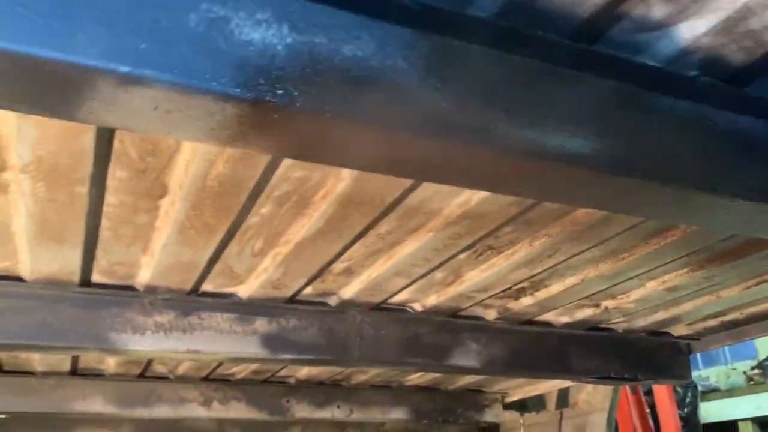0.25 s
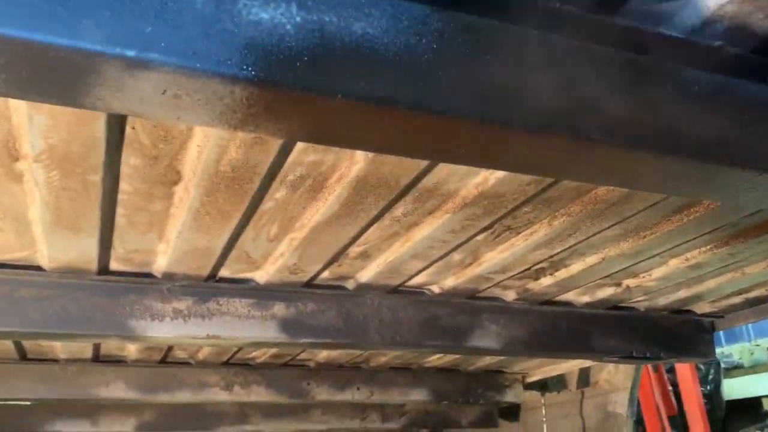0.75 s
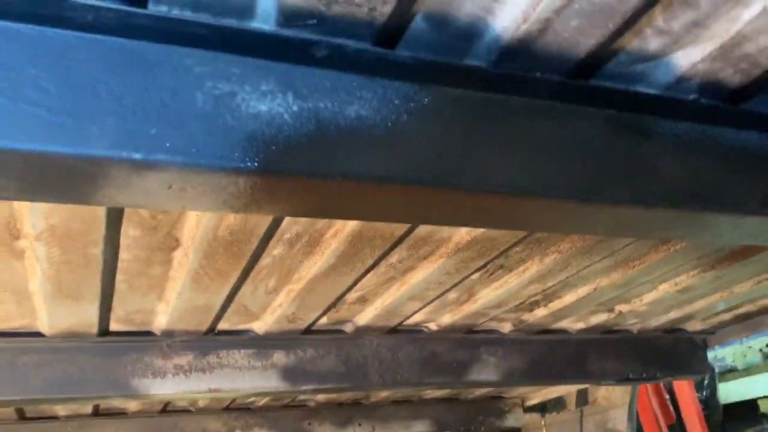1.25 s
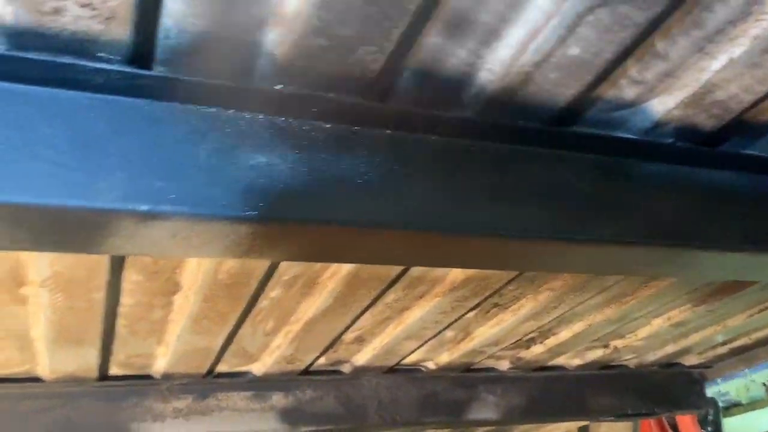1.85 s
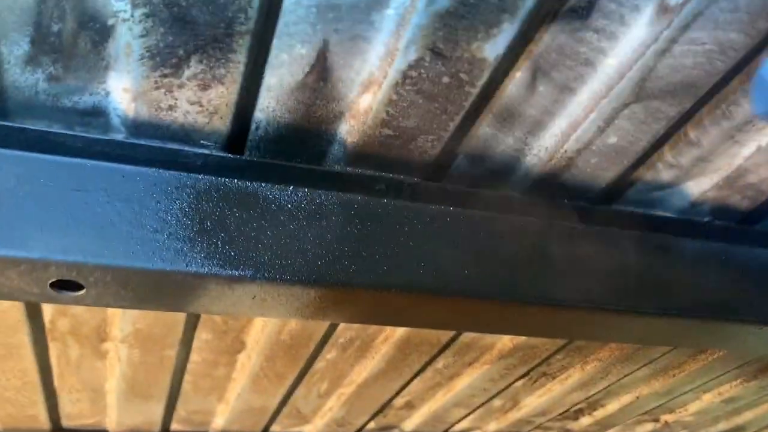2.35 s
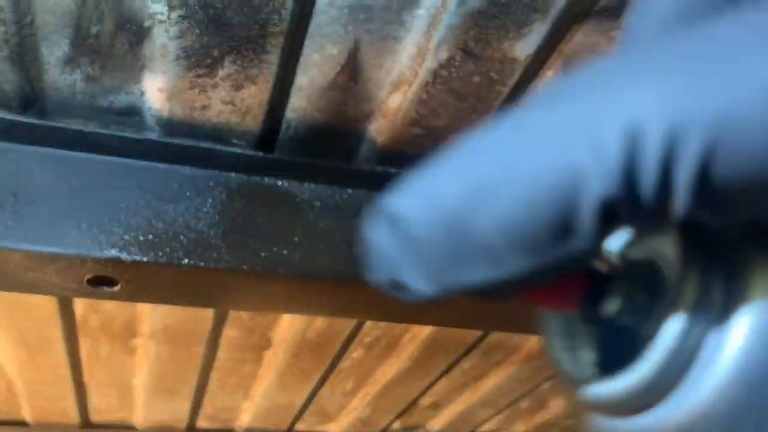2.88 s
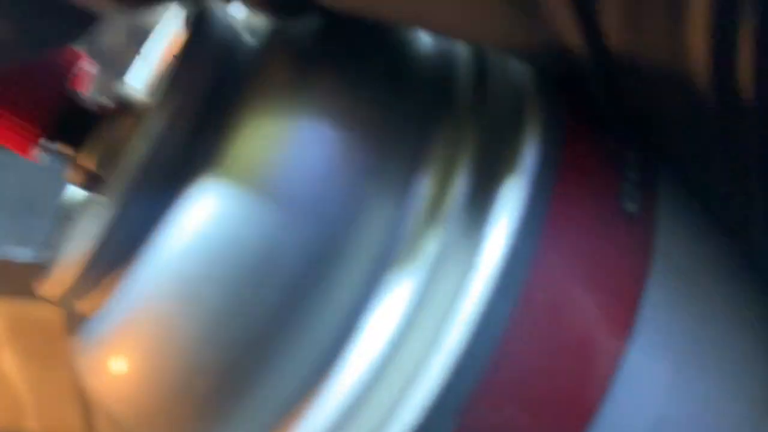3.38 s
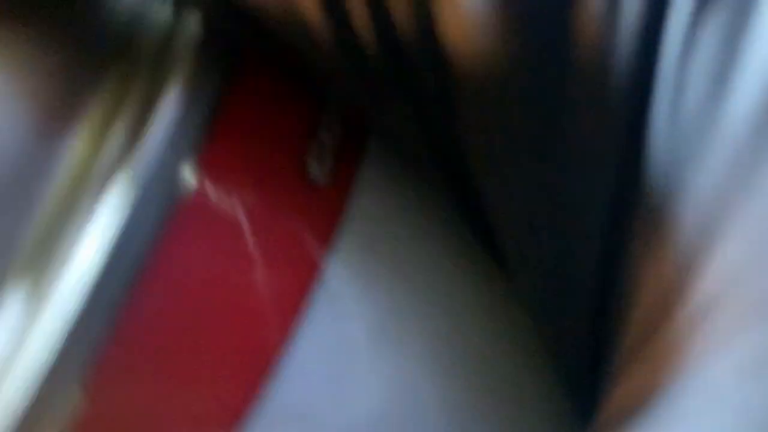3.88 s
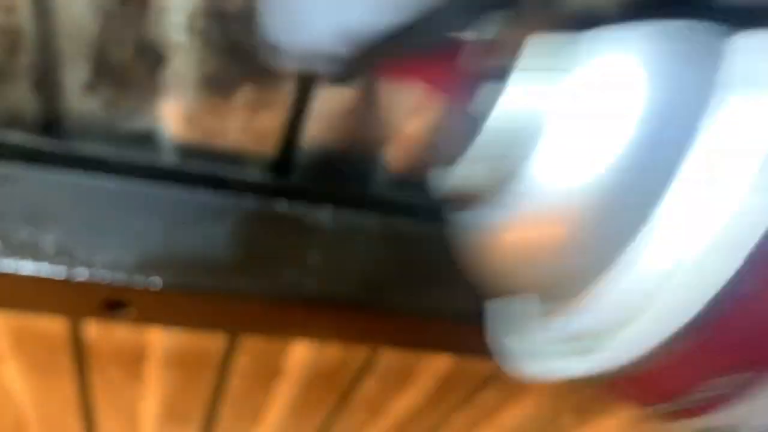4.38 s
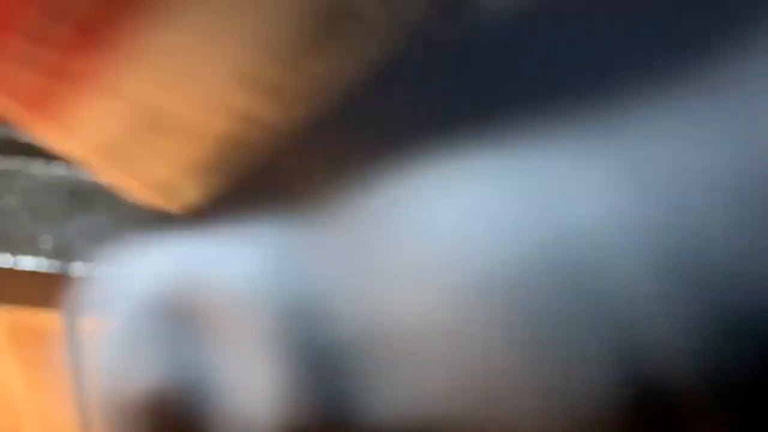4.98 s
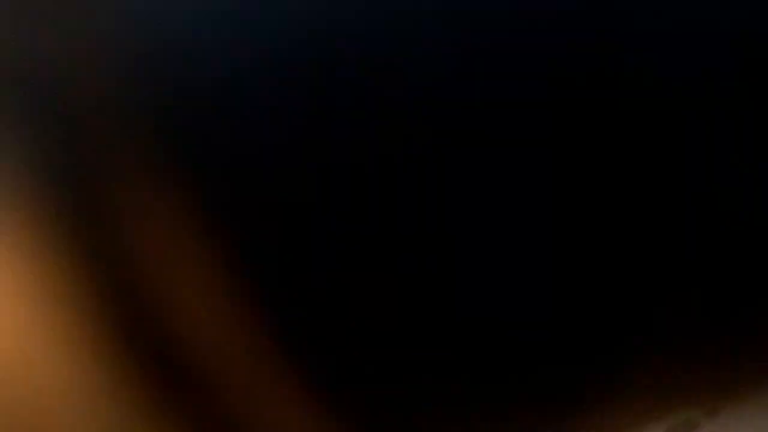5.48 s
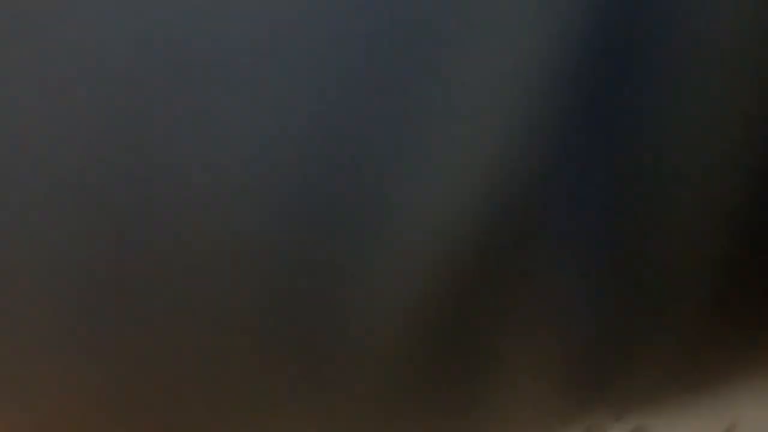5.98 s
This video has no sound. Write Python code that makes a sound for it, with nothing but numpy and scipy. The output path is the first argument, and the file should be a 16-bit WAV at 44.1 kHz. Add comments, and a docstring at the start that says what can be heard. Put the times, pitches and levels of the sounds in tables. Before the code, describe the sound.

A spray can hisses in ten short, close bursts, with sharp metallic clicks and light rattles of its mixing ball.

```python
"""Ten short hissing bursts from a spray can coating steel beams under a trailer deck, close up, mono.
The jet hisses brightly; can wall and a hollow beam resonate; the draught puffs at the mic.
Between bursts the mixing ball clatters in the can and the gloved hand shuffles.
Hiss and knocks reflect between ground and deck. Behind: faint tones, far rumble, mic hiss and,
at the end, a hand bumping the mic."""
import sys
import numpy as np
from scipy import signal
from scipy.io import wavfile
from scipy.ndimage import uniform_filter1d

SR = 44100
rng = np.random.default_rng(int(sys.argv[2]) if len(sys.argv) > 2 else 0)


def store_pcm(level_fs):
    """Save levels as 16-bit WAV."""
    pcm = np.round(np.clip(level_fs, -1, 1) * 32767).astype(np.int16)
    wavfile.write(sys.argv[1], SR, np.atleast_2d(pcm).T)


N = 274743

# valve presses: open t/s, rise/s, shut t/s, nearest t/s, sweep width/s;
# level/dB at nearest of jet, top, low wall, high wall, deck, draught, beam;
# f/Hz of the lift, dip, treble lift and treble dip set by hand and aim
BURSTS = [(0.069, 0.026, 0.26, .16, 0.1, -26, -20, -25, -21, -31, -41, -49, 4704, 4296, 9000, 6686),
          (0.634, .024, 0.7547, .705, 0.066, -25.5, -19, -24, -23, -33.5, -42.5, -47, 4900, 1768, 8800, 7938),
          (1.767, 0.023, 1.9274, 1.84, 0.086, -24, -19, -23.5, -23.5, -33.5, -44.5, -38.5, 3390, 2238, 9730, 6190),
          (2.134, 0.021, 2.294, 2.236, 0.11, -24.5, -24.5, -28.5, -28, -40.5, -55.5, -42.5, 4167, 2080, 5780, 6184),
          (2.506, 0.032, 2.684, 2.63, 0.11, -25.5, -22.5, -28.5, -25, -34.5, -41.5, -43.5, 2614, 3260, 9290, 8030),
          (3.077, 0.022, 3.2675, 3.2, 0.1, -24.5, -22.5, -27, -24.5, -36, -47, -44.5, 2595, 4957, 5580, 7390),
          (3.992, 0.02, 4.097, 4.05, 0.11, -25, -24.5, -30, -25.5, -38.5, -45, -45.5, 1912, 3840, 7436, 6520),
          (4.74, 0.024, 4.959, 4.88, .12, -23.5, -22, -27.5, -23.5, -37.5, -46.5, -43, 1617, 2415, 6930, 9702),
          (5.309, 0.022, 5.554, 5.44, 0.13, -23.5, -23, -29, -26, -37.5, -53, -43.5, 1624, 3710, 8232, 9060),
          (5.819, 0.023, 5.945, 5.89, 0.093, -22, -22.5, -29, -24, -35.5, -48, -42, 3216, 1783, 6174, 9250)]
# spectra of the jet, its thin top and the deck: f/Hz, level/dB
JET = [(4700, -39.5), (5300, -3), (6200, 0.5), (8000, -2.5), (9500, -2.5), (10300, -24.5)]
TOP = [(9400, -26), (10000, -11), (11600, -7.5), (12800, -1.5), (15000, -4.5), (16500, -7)]
DECK = [(560, -16), (680, -5), (930, -0.5), (1050, -4.5), (1350, -1), (1600, -18)]
# bright peaks colouring the hiss and the clicks: f/Hz, width/Hz, lift/dB
TREBLE_PEAKS = [(6230, 500, 1), (7270, 810, 7), (8820, 840, 9), (10590, 200, 6.5), (13900, 210, 6.5)]


def valve():
    """Seven layer envelopes: the valve opens, the can sweeps past, nozzle pressure bleeds off."""
    sweep_db = [0.25, -1.5, -3.5, -2.5, -6, -7.5, -6.5]  # per layer, one sweep width from nearest: level/dB
    spit_db, spit_s = np.c_[[1.5, 0, 0, 0.75, 0, 0, 0]], 0.027  # harder jet just after opening
    lag_power = np.c_[[0, 0, 0.15, 0.3, 0.4, 2.5, 2.5]]  # lower layers build more slowly
    bleed_db_per_s = -1000
    levels = np.zeros((7, N))
    for open_s, rise_s, shut_s, nearest_s, width_s, *columns in BURSTS:
        span = slice(round((open_s - 0.04) * SR), round((shut_s + 0.15) * SR))
        t = np.arange(N)[span] / SR
        opening = np.clip(1 + (t - open_s + 0.0031) / rise_s, 0, 1) ** 1.2
        build = np.clip(1 + (t - open_s - 0.012) / 0.045, 0, 1) ** lag_power
        bleed = gain_of(bleed_db_per_s * np.maximum(t - shut_s - 0.008, 0))
        away = abs(np.clip(t, open_s, shut_s) - nearest_s) / width_s
        sweep = gain_of(np.c_[columns[:7]] + np.outer(sweep_db, away ** 1.5))
        spit = gain_of(spit_db * np.exp(-np.maximum(t - open_s, 0) / spit_s))
        levels[:, span] += spit * opening * build * bleed * sweep
    return levels


def spray(levels):
    """Jet, top and can wall sputter together as droplets leave unevenly; the deck adds a mid band."""
    wall_spectrum = [(1200, -24.5), (1600, -4), (2400, -2), (3100, -0.5), (4300, 4), (4900, -2.5),
                     (5500, -16)]  # f/Hz, level/dB
    wall_lifts = [(1750, 310, 2.5), (2350, 400, 3.5), (3350, 590, 1.5), (3970, 1000, 2.5),
                  (4284, 110, -5.5)]  # resonances and a notch: f/Hz, width/Hz, lift/dB
    sputter = flicker(0.94, 0.0064)
    jet = noise(JET, TREBLE_PEAKS, patchy_db=3.5, patch=(30, 6), aimed=True) * sputter
    top = noise(TOP, TREBLE_PEAKS, patchy_db=3, patch=(30, 6)) * sputter
    wall = noise(wall_spectrum, wall_lifts, patchy_db=3, patch=(24, 3), aimed=True) * sputter
    low_wall = signal.oaconvolve(wall, signal.firwin(101, 3000, fs=SR), "same")
    deck = noise(DECK, patchy_db=3.95, size=1024)
    return (levels * [jet, top, evened(low_wall), evened(wall - low_wall), deck]).sum(0)


def knocks():
    """Ball or cap strikes the hand-damped can, and dry nozzle spits at 0.128, 0.706 and 2.335 s: tick and
    scrape ring the can modes, with fizz and a thud."""
    strikes = [(0.128, -6, 4000, -24, 0.00052), (0.706, -0.5, 4700, -15, 0.00028),
               (0.763, -15, 1990, -8, 0.0023), (0.798, -23, 1550, -31, 0.0013),
               (0.993, -52, 4300, -35, 0.0027), (1.002, -47, 3770, -34.5, 0.0042),
               (1.2152, -43, 3520, -17.5, 0.0015), (1.218, -25.5, 2890, -26.5, 0.0044),
               (1.227, -26.5, 2920, -21, 0.011), (1.258, -24.5, 2420, -35, 0.009),
               (1.267, -38, 2250, -31, 0.0025), (1.282, -30, 2360, -28, 0.0036),
               (1.293, -35, 2270, -37, 0.0054), (1.3205, -31.5, 1820, -40, 0.0017),
               (1.328, -41, 1850, -36, 0.0024), (1.34, -48.5, 1900, -33, 0.0032),
               (1.4879, -27, 2335, -26, 0.0039), (1.497, -33, 3570, -29.5, 0.0052),
               (1.513, -30.5, 1940, -34.5, 0.0017), (2.335, -10, 3000, -19.5, 0.00054),
               (2.364, -36, 1690, -17, 0.009), (2.378, -41, 1780, -25, 0.0037),
               (3.59, -38.5, 2480, -27.5, 0.0025), (3.603, -55, 4400, -32, 0.0093),
               (3.604, -48, 2160, -24, .005), (4.147, -41, 2150, -21, 0.0037),
               (4.58, -34.5, 2650, -23, .005), (4.587, -27, 3130, -25.5, 0.0089),
               (4.616, -31.5, 2650, -26.5, 0.0085), (4.655, -63, 2880, -32, 0.0076),
               (5.264, -28, 2700, -22.5, 0.011), (5.282, -25, 2400, -28.5, 0.011),
               (5.708, -50, 2500, -34, 0.01), (6.062, -44, 2970, -21.5, 0.0085)]  # t/s, level/dB, centre f/Hz, fizz re level/dB, scrape decay/s
    can_modes = [(1520, -11, 0.0073), (1840, -4, 0.015), (2095, -5.5, 0.02), (2080, -1, .011),
                 (2680, -0.5, 0.0064), (2980, -4.5, 0.013), (3630, -4, 0.018), (4294, 4.5, 0.014),
                 (4657, -2, 0.018), (4857, -9.5, 0.012), (6140, -3.5, 0.021)]  # f/Hz, level/dB, longest t60/s
    focus_db_per_oct, thud_db = -19, -30.5
    clatter, fizz, thud = np.zeros((3, N))
    t = np.arange(2500) / SR
    hz, db, t60_s = np.transpose(can_modes)[:, :, None]
    scatter = rng.standard_normal((len(strikes), 2, len(can_modes), 1))
    scrapes = rng.standard_normal((len(strikes), len(t)))
    for strike, (level_jitter, detune), scrape in zip(strikes, scatter, scrapes):
        at_s, level_db, centre_hz, fizz_db, scrape_s = strike
        mode_db = db + 1.8 * level_jitter + focus_db_per_oct * abs(np.log2(hz / centre_hz))
        sustain = np.clip(scrape_s / 0.0013, 0.35, 1)  # brief snaps hardly ring the wall
        partials = np.sin(2 * np.pi * hz * (1 + 0.042 * detune) * t)
        ring = (gain_of(mode_db - 60 * t / (t60_s * sustain)) * partials).sum(0)
        ring *= 1 - np.exp(-t / 0.00052)  # the wall gives before it rings
        drive = 0.63 * scrape * np.exp(-t / scrape_s)
        drive[0] = 2.5  # tick
        blow = signal.fftconvolve(drive, ring)
        add(clatter, at_s, gain_of(level_db) * blow / abs(blow).max())
        fizz_shape = (1 - np.exp(-t / 0.0018)) * np.exp(-t / (0.0061 + scrape_s))
        add(fizz, at_s, gain_of(level_db + fizz_db) * fizz_shape)
        add(thud, at_s, gain_of(level_db + thud_db) * sustain ** 3 * np.exp(-t / 0.012))
    clatter += fizz * noise(JET[:5] + TOP[2:], TREBLE_PEAKS)
    low_cut = signal.butter(3, 1300, "high", fs=SR, output="sos")
    return signal.sosfilt(low_cut, clatter) + thud * noise(DECK)


def beam(level):
    """The beam's air cavity hums under each burst and booms as the jet crosses an opening."""
    cavity_spectrum = [(240, -22), (320, -12), (390, -9), (440, 0), (490, -10), (545, -8), (630, -24)]  # f/Hz, level/dB
    crossings = [(.232, -44, 0.055), (.745, -44, 0.052), (1.794, -29, 0.015), (1.929, -30, .025),
                 (2.0, -56, 0.034), (2.306, -36.5, .022), (2.688, -35.5, 0.024), (3.217, -29.5, 0.058),
                 (3.33, -56, 0.04), (4.77, -39.5, 0.027), (4.94, -44.5, 0.066), (5.08, -63.5, 0.029),
                 (5.35, -38.5, 0.018), (5.52, -53, 0.1)]  # centre t/s, level/dB, half width/s
    t = np.arange(N) / SR
    pole = np.exp(-1 / (0.0067 * SR))  # 6.7 ms lag
    hum = signal.lfilter([1 - pole], [1, -pole], level) * noise(cavity_spectrum, patchy_db=4.5, size=2048)
    booms = sum(gain_of(db) * np.exp(-((t - at_s) / width_s) ** 2) for at_s, db, width_s in crossings)
    return hum + booms * noise(cavity_spectrum, size=2048)


def draught(level):
    """Air moved by the jet puffs at the mic."""
    puff_spectrum = [(15, -16.5), (40, 1), (150, 5), (260, 3), (400, -7.5)]  # f/Hz, level/dB
    return level * noise(puff_spectrum, patchy_db=3.5, size=2048) * flicker(1.1, 0.084)


def under_deck(x, paths=3):
    """Sparse reflections between ground and deck; the moving can feeds shifting paths."""
    band_decay = [(300, 0.76), (800, 0.064), (2100, 0.18), (5500, .16), (14600, .14)]  # f/Hz, t60/s
    shift_hz = 7.5
    taps = np.zeros((paths, SR // 2))
    slots = np.arange(160, SR // 2 - 20, 10)
    arrivals = slots + rng.integers(0, 10, (paths, len(slots)))
    np.put_along_axis(taps, arrivals, rng.choice([-1., 1.], arrivals.shape), 1)
    hz, t, spectra = signal.stft(taps, SR, nperseg=256)
    band_hz, band_t60_s = np.transpose(band_decay)
    t60_s = np.interp(np.log(hz + 1), np.log(band_hz), band_t60_s)[:, None]
    tails = signal.istft(spectra * gain_of(-60 * t / t60_s), SR, nperseg=256)[1]
    phase = np.pi * (2 * shift_hz * np.arange(N) / SR + np.arange(paths)[:, None] / paths)
    feeds = x * np.cos(phase) * np.sqrt(2 / paths)
    return signal.fftconvolve(feeds, tails / np.linalg.norm(tails[0]), axes=1)[:, :N].sum(0)


def bumps():
    """A hand bumps the mic body: low damped sines, soft onset."""
    mic_thuds = [(6.038, -39.5, 261, 0.081), (6.063, -37.5, 275.5, 0.061), (6.094, -50, 306, 0.13),
                 (6.115, -50, 299, 0.099)]  # t/s, level/dB, f/Hz, t60/s
    out, t = np.zeros(N), np.arange(6000) / SR
    onset = 1 - np.exp(-t / 0.001)
    for at_s, db, hz, t60_s in mic_thuds:
        add(out, at_s, gain_of(db - 60 * t / t60_s) * onset * np.sin(2 * np.pi * hz * t))
    return out


def tones():
    """Brief, faint, fuzzy notes swell and fade."""
    faint_notes = [(0.497, -71.5, 1293, 0.12), (0.818, -49.5, 580, 0.065), (0.997, -64, 606, 0.038),
                   (1.072, -65, 2320, 0.053), (1.173, -72, 1910, .06), (1.408, -67.5, 1295, 0.16),
                   (2.495, -37.5, 936, 0.024), (3.698, -72.5, 2060, 0.066), (3.706, -73.5, 2900, 0.039),
                   (4.469, -76, 2790, 0.041), (5.171, -73, 2140, .04), (5.196, -67, 1580, 0.028),
                   (5.74, -63.5, 2900, 0.07)]  # centre t/s, level/dB, f/Hz, half length/s
    out = np.zeros(N)
    for at_s, db, hz, half_s in faint_notes:
        t = np.arange(-half_s, half_s, 1 / SR)
        swell = np.cos(np.pi * t / (2 * half_s)) ** 2
        add(out, at_s - half_s, gain_of(db) * swell * np.sin(2 * np.pi * hz * t))
    return out * flicker(3.7, 0.0035)


def glove():
    """Grainy shuffle in narrow shifting bands as the gloved hand resettles."""
    rub_spectrum = [(900, -27), (1250, 2), (1900, -3), (2400, -6.5), (3100, -11), (4000, -5), (4700, -12.5),
                    (5500, -26), (9000, -29.5), (15000, -32.5)]  # f/Hz, level/dB
    rub_lifts = [(1340, 150, 0), (2000, 130, 9), (2400, 180, 6), (3800, 690, 4.5), (4160, 250, 5.5)]  # f/Hz, width/Hz, lift/dB
    hand_moves = [(0.0, -70, -8, 0.058), (0.299, -50.5, -62.5, .17), (0.783, -54, -35, 0.35),
                  (1.3, -66, -70, 0.15), (2.735, -65.5, -57.5, 0.33), (3.36, -75, -63.5, 0.18),
                  (3.619, -77, -58.5, .11), (4.181, -69, -150, .15), (4.379, -83, -30, .07),
                  (5.021, -59.5, -130, 0.27), (5.628, -64, -59, 0.13), (6.052, -74, -200, 0.12)]  # t/s, level/dB, fade/(dB/s), length/s
    settle_db_per_s = -250
    level, t = np.zeros(N), np.arange(N) / SR
    for at_s, db, fade_db_per_s, length_s in hand_moves:
        onset = np.clip((t - at_s) / 0.02 + 1, 0, 1)
        settle_db = settle_db_per_s * np.maximum(t - at_s - length_s, 0)
        level += onset * gain_of(db + fade_db_per_s * abs(t - at_s) + settle_db)
    rub = noise(rub_spectrum, rub_lifts, patchy_db=5, size=1024, patch=(16, 3))
    return level * rub * flicker(1.6, 0.005)


def background():
    """Drifting far rumble and steady mic hiss."""
    rumble_spectrum = [(12, -17), (25, 1.5), (45, -2.5), (120, -11), (270, -17.5), (600, -19.5), (900, -26),
                       (1500, -37)]  # f/Hz, level/dB
    rumble_drift = [(0, -66), (.55, -67.5), (1.15, -69), (1.65, -66), (2.95, -70), (3.5, -69), (3.85, -76),
                    (4.4, -70), (5.2, -69), (5.75, -65), (6.23, -69)]  # t/s, level/dB
    hiss_spectrum = [(700, -22), (1200, -1), (4000, -5), (7000, -5.5),  # f/Hz, level/dB
                     (11000, -9.5), (14000, -11), (15800, -21.5)]
    rumble_db = np.interp(np.arange(N) / SR, *np.transpose(rumble_drift))
    rumble = noise(rumble_spectrum, patchy_db=2, size=2048, patch=(8, 6))
    return gain_of(rumble_db) * rumble + gain_of(-83) * noise(hiss_spectrum, patchy_db=2)


def noise(points, lifts=(), patchy_db=1.0, size=512, patch=(8, 5), aimed=False):
    """Shaped noise, rms 1, with drifting patches (frames, bins); aimed: coloured by the nearest burst."""
    aim_db = [3, -3.5, 2.5, -3]  # lift, dip, treble lift, treble dip: level/dB
    aim_width_hz = 450
    frames, hz = 4 * N // size + 5, np.fft.rfftfreq(size, 1 / SR)[:, None]
    real, imag, patches = rng.standard_normal((frames, len(hz), 3)).T
    patches = evened(uniform_filter1d(uniform_filter1d(patches, patch[1], axis=0), patch[0], axis=1))
    point_hz, point_db = np.transpose(points)
    db = np.interp(np.log(hz + 1), np.log(point_hz + 1), point_db, left=-90, right=-90)
    db = db + sum(lift_db / (1 + (2 * (hz - f) / width_hz) ** 2) for f, width_hz, lift_db in lifts)
    if aimed:
        columns = np.transpose(BURSTS)
        middle_s, aim_hz = columns[[0, 2]].mean(0), columns[-4:]
        colour_db = sum(lift / (1 + (2 * (hz - f) / aim_width_hz) ** 2) for f, lift in zip(aim_hz, aim_db))
        frame_s = np.arange(frames)[:, None] * size / (4 * SR)
        db = db + colour_db[:, abs(frame_s - middle_s).argmin(1)]
    spectra = (real + 1j * imag) * gain_of(db + patchy_db * patches)
    return evened(signal.istft(spectra, nperseg=size, noverlap=3 * size // 4)[1][:N])


def flicker(depth_db, span_s):
    """Randomly wavering gain, rms 1."""
    size = int(span_s * SR)
    drift = uniform_filter1d(uniform_filter1d(rng.standard_normal(N), size), size)
    return evened(gain_of(depth_db * evened(drift)))


def gain_of(db):
    return 10 ** (np.asarray(db) / 20)


def evened(x):
    return x / np.sqrt(np.mean(x ** 2) + 1e-20)


def add(mix, at_s, sound):
    part = mix[round(at_s * SR):][:len(sound)]
    part += sound[:len(part)]


def scene():
    """Valve drives spray, draught and beam; only spray and knocks reflect."""
    levels = valve()
    hiss, puffs = spray(levels[:5]), draught(levels[5])
    blows, boom = knocks(), beam(levels[6])
    reflections = under_deck(gain_of(-10.5) * hiss + gain_of(-10) * blows)
    mono = gain_of(-1.16) * hiss + blows + boom + puffs + reflections
    mono += bumps() + tones() + glove() + background()
    return np.array([mono, mono])


def record(dry):
    """Input clipping on the loudest knock, then the band limit."""
    clip_level, edge_hz = 0.97, 15750
    band_limit = signal.firwin(401, edge_hz, window=("kaiser", 9), fs=SR)
    return signal.oaconvolve(np.clip(dry, -clip_level, clip_level), band_limit[None], "same")


dry = scene()
out = record(dry)
store_pcm(out)
```